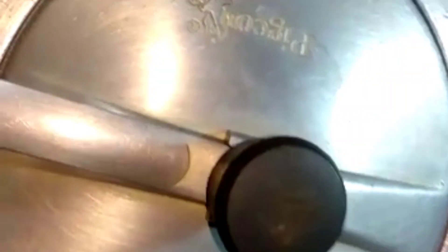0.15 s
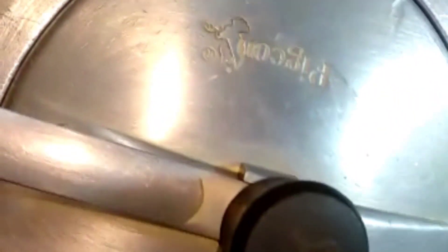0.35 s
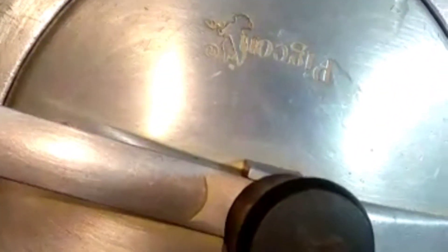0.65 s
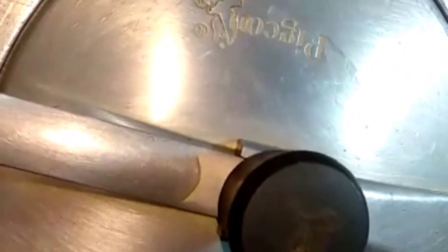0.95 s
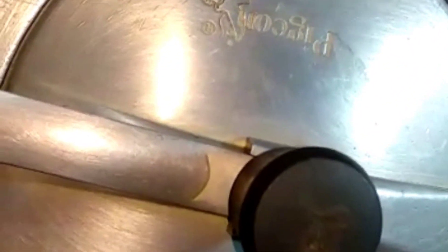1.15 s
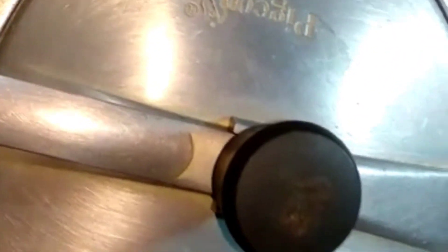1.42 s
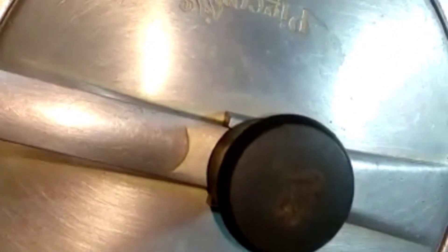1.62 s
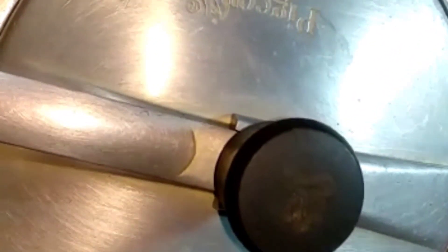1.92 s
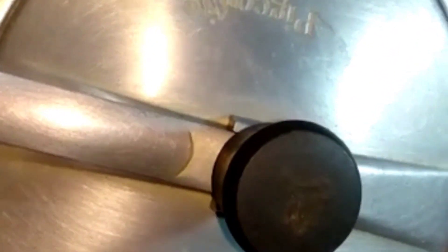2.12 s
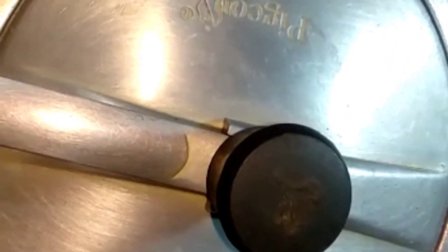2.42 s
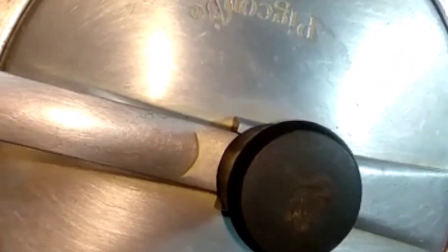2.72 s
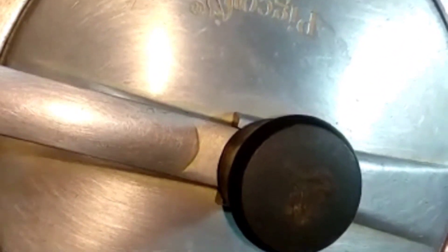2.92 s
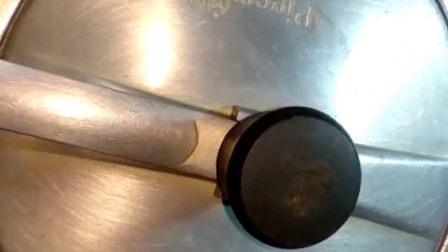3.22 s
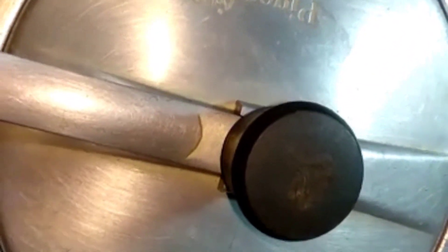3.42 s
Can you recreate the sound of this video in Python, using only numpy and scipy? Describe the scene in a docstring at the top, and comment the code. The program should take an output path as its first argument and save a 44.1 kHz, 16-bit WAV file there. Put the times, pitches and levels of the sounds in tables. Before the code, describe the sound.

A pressure cooker hisses thinly throughout, close up in a small kitchen, over the low rumble, thumps and pops of boiling water. At about 1 second the valve sputters wetly with a knock. Three sharp spits, each with a short bright puff of steam, come at 1.5, 2.1 and 2.8 seconds. Bubble knocks grow busier toward the end, and another sputter briefly rings the pot around 3.2 seconds.

```python
"""A thin steady hiss leaks from the valve of a pressure cooker, close up in a small kitchen.
Boiling water thumps over a low rumble, and bubbles pop and knock inside the pot.
Twice, water caught in the valve sputters wetly and rings the pot. Three times the weight
on the valve lifts, and steam escapes with a sharp spit and a short bright puff."""
import sys
import numpy as np
from scipy import signal
from scipy.fft import rfft, irfft, next_fast_len
from scipy.io import wavfile
from scipy.ndimage import map_coordinates

SR = 44100
rng = np.random.default_rng(int(sys.argv[2]) if len(sys.argv) > 2 else 0)


def file_out(sig):
    """Save sig as 16-bit WAV at sys.argv[1]."""
    # one column per channel
    cols = np.atleast_2d(sig).T
    # limit, then scale
    lim = np.clip(cols, -1, 1)
    pcm = np.round(lim * 32767).astype(np.int16)
    wavfile.write(sys.argv[1], SR, pcm)


N = 156555

# A t60 is the time a sound takes to fade by 60 dB. A colour says how strong each frequency is.
# Colour of the leak (f/Hz, level/dB)
LEAK_COLOUR = [(200, -9.5), (600, -10.5), (1100, 2), (2000, -0.5), (4500, -2.5), (6500, 2), (8500, 2.5),
               (11000, 2.5), (13000, -1.5), (15500, -7.5)]
# Left-right balance of the leak (f/Hz, left minus right/dB)
LEAK_BALANCE = [(60, 0.5), (120, -25), (240, 15), (480, 6), (950, 2), (1890, 6.5), (3770, 4), (7520, 3.5),
                (15000, -9.5)]
# Colour of the boil's rumble (f/Hz, level/dB)
RUMBLE_COLOUR = [(20, -29), (40, -45), (62, -14.5), (90, -6.5), (115, -1.5), (150, -7), (200, -7),
                 (300, -12), (500, -18.5), (900, -18.5), (2000, -39)]
# Low thumps of the boil (t/s, level/dB)
THUMP_EVENTS = [(.026, -30), (0.114, -27), (0.139, -36), (.18, -30.5), (0.29, -36), (.432, -34.5),
                (0.665, -35.5), (.854, -29.5), (1.0, -29), (1.041, -30), (1.066, -24.5), (1.21, -34.5),
                (1.34, -30), (1.504, -33), (1.665, -26.5), (1.738, -26.5), (1.771, -28.5), (1.878, -34),
                (2.101, -34.5), (2.415, -31.5), (2.574, -26), (2.699, -27), (2.767, -29.5), (2.797, -24.5),
                (2.98, -26), (3.188, -28.5), (3.335, -25.5), (3.491, -38)]
# Tones in a thump (f/Hz, level/dB, t60/s)
THUMP_TONES = [(84.5, -18, 0.12), (115.2, -1, 0.18), (190.6, -3, 0.14), (247.6, -11, 0.1), (340, -11, 0.11)]
# Colour of the gurgle with each thump (f/Hz, level/dB)
GURGLE_COLOUR = [(120, -7), (280, -2), (520, -3), (1100, -5.5), (2000, -27), (5000, -41)]
# Knocks of bursting bubbles (t/s, level/dB, f/Hz, tick offset/dB)
KNOCK_EVENTS = [(.14, -43, 840, -3), (.186, -42, 830, 5), (.516, -38, 905, -7), (1.062, -16, 804, -5.5),
                (1.346, -31.5, 830, -1.5), (1.728, -35.5, 820, 7), (1.804, -33, 1020, 5),
                (1.989, -36, 814, -13), (2.337, -31, 920, 4), (2.398, -31, 730, 0.5),
                (2.408, -31, 760, -1.5), (2.444, -33.5, 680, -16), (2.67, -17.5, 820, -8.5),
                (2.961, -20.5, 746, -20), (3.02, -28, 594, 0.5), (3.07, -33.5, 845, 8),
                (3.105, -20, 784, -2.5), (3.239, -15.5, 890, -1.5), (3.2542, -21.5, 940, 2.5),
                (3.2625, -24, 930, 2.5), (3.272, -15.5, 534, -2.5), (3.407, -36, 815, -8)]
# Colour of a knock's tick (f/Hz, level/dB)
TICK_COLOUR = [(150, -0.5), (450, 1.5), (1200, 0), (2200, -0.5), (3000, 2), (4500, -8), (9000, -7.5),
               (15000, -19)]
# Wet sputters (t/s, level/dB, rise/s, t60/s, fizz offset/dB, ring offset/dB, top of the fizz/dB)
SPUTTER_EVENTS = [(1.0606, -28, 0.004, 0.093, 4, -18, -1), (3.239, -19, 0.017, 0.13, -6.5, -3.5, -9)]
# Colours of a sputter's spray and fine fizz (f/Hz, level/dB)
SPRAY_COLOUR = [(100, -40), (300, -11), (530, 2), (700, -1), (950, 2.5), (1350, -3), (2400, -3), (4000, -9),
                (7000, -16.5), (15000, -27)]
FIZZ_COLOUR = [(1500, -8), (3000, -3.5), (7500, -2.5), (10000, -5), (15500, -10)]
# Ringing tones of pot and lid (f/Hz, width/Hz, level/dB)
POT_TONES = [(320, 22, -11), (520, 28, -2), (672, 16, -6), (786, 22, -6), (871, 22, -6), (926, 16, 4),
             (1121, 20, -3), (1514, 22, -8), (1702, 20, -9), (1757, 26, -7), (2293, 30, -10),
             (2354, 22, -8), (2468, 24, -10), (3062, 36, -12)]
# Puffs of steam (t/s, spit level/dB, hiss level/dB, hold/s, resonance f/Hz, closing t60/s,
# breathy body offset/dB, hollow level/dB, ring level/dB)
PUFF_EVENTS = [(1.5221, -11.5, -26.5, 0.094, 8700, 0.38, -11.5, -43.5, -40),
               (2.14, -14, -28.5, 0.095, 8280, 0.44, -10.5, -42, -40),
               (2.845, -13.5, -30, 0.113, 8400, 0.38, -2.5, -45.5, -46)]
# Colours of a puff: spit, jet, breathy body, hollow breath under the weight (f/Hz, level/dB)
SPIT_COLOUR = [(150, -43), (600, -2), (1300, -8), (2200, 1.5), (3500, 3), (4800, -1.5), (6400, 3.5),
               (9000, 2), (10300, 0.5), (11500, 1), (15500, -2.5)]
JET_COLOUR = [(2000, -28), (4000, -2), (5400, -5), (6600, 2.5), (7500, 4), (9200, 2.5), (9800, 0),
              (10800, 3.5), (13000, -3.5), (14200, -6), (15400, -5.5)]
BODY_COLOUR = [(150, -7), (450, -3.5), (800, 2.5), (1400, -3), (2400, -1.5), (4000, -8), (7000, -5),
               (12000, -31)]
HOLLOW_COLOUR = [(250, -30), (550, -3), (740, -1), (930, -14), (1250, -11), (3000, -36)]
# Faint whistles of the nozzle (t/s, hold/s, f/Hz, level/dB)
WHISTLE_EVENTS = [(1.528, 0.12, 9050, -38), (2.854, 0.067, 13384, -45)]
# Left-right balance of the valve and pot (f/Hz, left minus right/dB)
VALVE_BALANCE = [(300, -0.5), (800, 3), (1500, 4.5), (3500, 8), (6000, 6.5), (8700, 2.5), (11000, -1),
                 (14000, -3.5)]
# How alike left and right sound (f/Hz, likeness from 0 to 1)
LIKENESS = [(100, 1), (300, 0.93), (600, 0.7), (1200, 0), (2500, 0), (5000, 0), (9000, 0), (14000, 0.026)]
# How long the kitchen echoes (f/Hz, t60/s)
ROOM_DECAY = [(150, 0.57), (800, 0.32), (3000, 0.23), (8000, 0.17), (15000, 0.12)]

CENTRED = [(100, 0)]  # equal on both sides (f/Hz, left minus right/dB)
JET_RISE_S = 0.0045


def amp(db):
    """Turn decibels into a gain."""
    return 10 ** (np.asarray(db) / 20)


def unit(x):
    """Scale x to an average power of 1."""
    return x / np.sqrt(np.mean(x ** 2) + 1e-20)


def along(points, hz):
    """Read a value between (f/Hz, value) points, on a log frequency axis."""
    f, v = np.transpose(points)
    return np.interp(np.log(hz + 1), np.log(f + 1), v)


def since(start):
    """Seconds since start, zero before it."""
    return np.maximum(np.arange(N) / SR - start, 0)


def fade(t, t60):
    """Die away by 60 dB every t60 seconds."""
    return np.exp(-np.log(1000) * t / t60)


def burst(start, rise, t60):
    """Rise in a straight line, then die away."""
    t = since(start)
    return np.minimum(t / rise, 1) * fade(np.maximum(t - rise, 0), t60)


def wobble(rate):
    """A smooth curve through `rate` random values a second."""
    return map_coordinates(rng.standard_normal(int(N * rate / SR) + 4), [np.arange(N) * rate / SR])


def ripple(hz, step_hz):
    """A smooth random curve along frequency."""
    return map_coordinates(rng.standard_normal(1024), [hz / step_hz], mode="wrap")


def sides(balance, hz):
    """Left and right gains for a balance curve."""
    return amp(np.outer([.5, -.5], along(balance, hz)))


def stereo(pair, hz):
    """Blend two noises into left and right spectra, alike in the bass and unrelated in the treble."""
    turn = np.arccos(np.clip(along(LIKENESS, hz), -1, 1)) / 2
    mid, side = rfft(pair) * [np.cos(turn), np.sin(turn)]
    return np.array([mid + side, mid - side])


def noise(colour, balance=VALVE_BALANCE, extra_db=lambda hz: 0):
    """Stereo noise of power 1 in a given colour; extra_db reshapes that colour."""
    size = next_fast_len(N)
    hz = np.fft.rfftfreq(size, 1 / SR)
    white = stereo(rng.standard_normal((2, size)), hz)
    shaped = white * amp(along(colour, hz) + extra_db(hz)) * sides(balance, hz)
    return unit(irfft(shaped, size)[:, :N])


def kitchen(x, room_db, early_db, early_t60):
    """Add quick echoes off lid and hob, and the longer tail of the room."""
    hz, t, spectra = signal.stft(rng.standard_normal((2, SR // 2)), SR, nperseg=256)
    tail = signal.istft(spectra * fade(t, along(ROOM_DECAY, hz)[:, None]), SR, nperseg=256)[1]
    t = np.arange(tail.shape[1]) / SR
    early = rng.standard_normal(tail.shape) * fade(t, early_t60)
    echoes = amp(room_db) * tail / np.linalg.norm(tail[0])
    echoes += amp(early_db) * early / np.linalg.norm(early[0])
    echoes = irfft(stereo(echoes, np.fft.rfftfreq(len(t), 1 / SR)))
    echoes = np.pad(echoes, ((0, 0), (SR // 400, 0)))  # they arrive 2.5 ms late
    return x + signal.fftconvolve(x * np.ones((2, 1)), echoes, axes=1)[:, :N]


def leak(level_db=-41):
    """Steam slips past the seated weight in a thin steady hiss."""
    return amp(level_db + 0.16 * wobble(9.8)) * noise(LEAK_COLOUR, LEAK_BALANCE)


def boil(rumble_db=-46.5, rise_s=0.0079, gurgle_db=-16):
    """Boiling water makes dull thumps, each with a soft gurgle, over an unsteady rumble."""
    sway = amp(0.8 * wobble(29.71))
    rumble = amp(rumble_db) * unit(sway * noise(RUMBLE_COLOUR, CENTRED))
    t = np.arange(SR // 3) / SR
    thumps, churn = np.zeros(N + SR), 0
    for start, db in THUMP_EVENTS:
        ring = 0
        for hz, tone_db, t60 in THUMP_TONES:
            louder, higher = rng.standard_normal(2)  # no two thumps are the same
            pitch = hz * np.exp(0.044 * higher)
            ring += amp(tone_db + 2 * louder) * fade(t, t60) * np.sin(2 * np.pi * pitch * t)
        thumps[round(start * SR):][:len(t)] += amp(db) * ring * (1 - np.exp(-t / rise_s))
        churn += amp(db + gurgle_db) * burst(start, rise_s, t60=0.13)
    return rumble + thumps[:N] + churn * noise(GURGLE_COLOUR, CENTRED)


def simmer(count=70, typical_db=-49.5, typical_hz=740):
    """Small bubbles pop at random all the while, each a short fading tone."""
    pops, t = np.zeros(N + SR), np.arange(SR // 16) / SR
    for at in rng.integers(0, N, count):
        louder, higher = np.clip(rng.standard_normal(2), -2, 2)
        tone = np.sin(2 * np.pi * typical_hz * np.exp(.35 * higher) * t)
        pops[at:][:len(t)] += amp(typical_db + 3 * louder) * fade(t, t60=0.033) * tone
    return kitchen(pops[:N], room_db=-10.5, early_db=-3, early_t60=0.066)


def knocks(rise_s=0.0013):
    """Each bursting bubble gives a hollow knock of a few cycles and a small noisy tick."""
    tones, ticking = 0, 0
    for start, db, hz, tick_db in KNOCK_EVENTS:
        tones += amp(db) * burst(start, rise_s, t60=0.015) * np.sin(2 * np.pi * hz * since(start))
        ticking += amp(db + tick_db) * burst(start, rise_s, t60=0.025)
    ticks = .5 * ticking * noise(TICK_COLOUR)
    return (kitchen(tones, room_db=-8, early_db=-2.5, early_t60=0.12)
            + kitchen(ticks, room_db=1.5, early_db=-2.5, early_t60=0.082))


def sputters(seep_s=0.028, seep_db=-15):
    """Water caught in the valve seeps, then tears into spray and rings the pot."""
    spray, water, ring = noise(SPRAY_COLOUR), 0, 0
    for start, db, rise, t60, fizz_db, ring_db, top_db in SPUTTER_EVENTS:
        fizz = noise(FIZZ_COLOUR, extra_db=lambda hz: along([(9000, 0), (14000, top_db)], hz))
        swell = burst(start, rise, t60) + amp(seep_db) * burst(start - seep_s, seep_s, t60)
        tearing = unit(amp(3 * wobble(600)))
        droplets = unit(amp(6 * wobble(1800)))
        water += amp(db) * swell * tearing * (spray + amp(fizz_db) * fizz * droplets)
        ring += amp(db + ring_db) * pot_ring(start, rise)
    return ring + kitchen(water, room_db=-6, early_db=-8.5, early_t60=0.2)


def pot_ring(start, rise):
    """Pot and lid ring with their own tones; the narrower a tone, the longer it lasts."""
    t, ring = since(start), 0
    for hz, width, db in POT_TONES:
        phase = rng.uniform(0, 2 * np.pi) + 0.25 * rng.standard_normal((2, 1))
        tone = np.sin(2 * np.pi * hz * t + phase) * sides(VALVE_BALANCE, hz)
        ring += amp(db) * burst(start, rise, t60=np.log(1000) / (np.pi * width)) * tone
    return ring


def steam_noises(peak_hz, width_hz=700):
    """Noise for one spit and its jet: each gap under the weight colours the steam its own way."""
    def resonance(hz):
        return np.exp(-.5 * ((hz - peak_hz) / width_hz) ** 4)

    def jet_db(hz):
        off_peak = np.minimum(abs(hz - peak_hz) / (2 * width_hz), 1)
        return 8 * resonance(hz) + 1.8 * ripple(hz, 300) * off_peak + ripple(hz, 60)

    spit = noise(SPIT_COLOUR, extra_db=lambda hz: 4.5 * resonance(hz))
    return spit, noise(JET_COLOUR, extra_db=jet_db)


def puffs(spit_t60=0.034, seep_s=0.0034, seep_db=-14.5, sag_db_per_s=34):
    """The weight lifts with a spit and rings the pot; the jet holds, weakens and closes off."""
    body, hollow, steam, ring = noise(BODY_COLOUR), noise(HOLLOW_COLOUR), 0, 0
    for start, spit_db, hiss_db, hold, peak_hz, close_t60, body_db, hollow_db, ring_db in PUFF_EVENTS:
        t = since(start)
        spit, jet = steam_noises(peak_hz)
        seep = amp(seep_db) * burst(start - seep_s, seep_s, spit_t60)
        crack = burst(start, rise=0.0014, t60=spit_t60)
        steam += amp(spit_db) * (seep + crack) * spit
        opening = np.minimum(t / JET_RISE_S, 1) * fade(since(start + hold), close_t60)
        flow = opening * amp(hiss_db + sag_db_per_s * (hold / 2 - t))
        flutter = amp(.8 * wobble(98))
        steam += flow * flutter * (jet + amp(body_db) * body + amp(hollow_db - hiss_db) * hollow)
        ring += amp(ring_db) * pot_ring(start, JET_RISE_S)
    return ring + kitchen(steam + whistles(), room_db=-7.5, early_db=-14, early_t60=0.049)


def whistles():
    """The nozzle adds a faint, wavering whistle to two of the puffs."""
    t, out = since(0), 0
    for start, hold, hz, db in WHISTLE_EVENTS:
        swell = np.minimum(since(start) / JET_RISE_S, 1) * fade(since(start + hold), t60=.15)
        waver = wobble(200) + 1j * wobble(200)  # random strength and phase
        tone = np.real(waver * np.exp(2j * np.pi * hz * t))
        out += amp(db) * swell * tone * sides(VALVE_BALANCE, hz)
    return out


def scene():
    """The valve and the boiling pot together."""
    return leak() + boil() + simmer() + knocks() + sputters() + puffs()


def record(dry, low_hz=41, top_hz=15760):
    """The microphone sheds the deep bass and the very highest treble."""
    trimmed = signal.sosfilt(signal.butter(2, low_hz, "high", fs=SR, output="sos"), dry)
    size = next_fast_len(N + 8192)
    hz = np.fft.rfftfreq(size, 1 / SR)
    treble_cut = np.clip((top_hz - hz) / 200 + .5, 0, 1)
    return irfft(rfft(trimmed, size) * treble_cut, size)[..., :N]


dry = scene()
out = record(dry)
file_out(out)
```